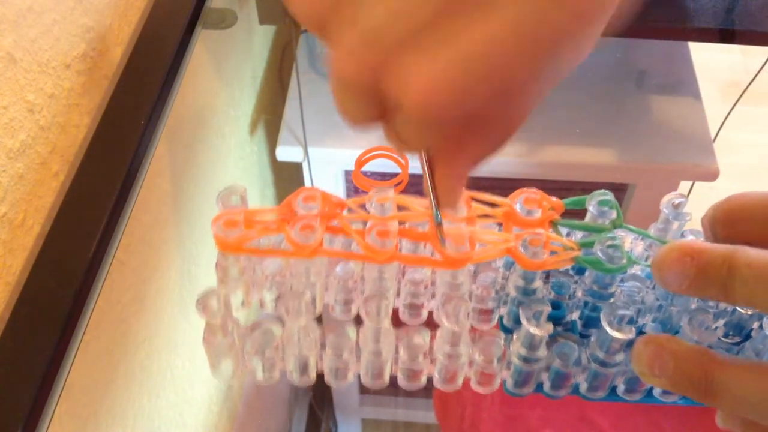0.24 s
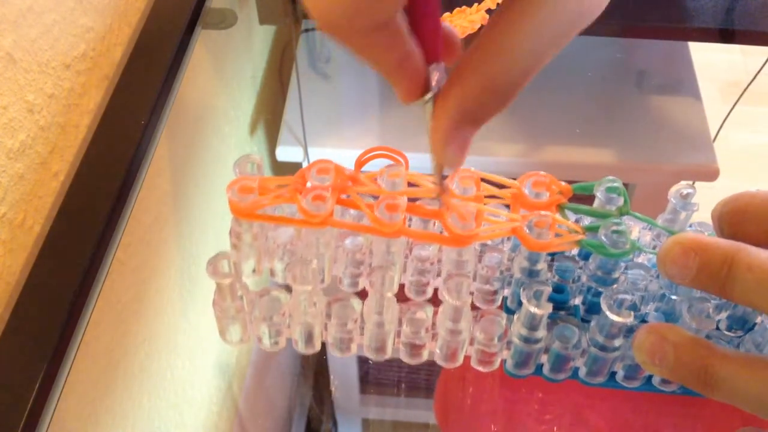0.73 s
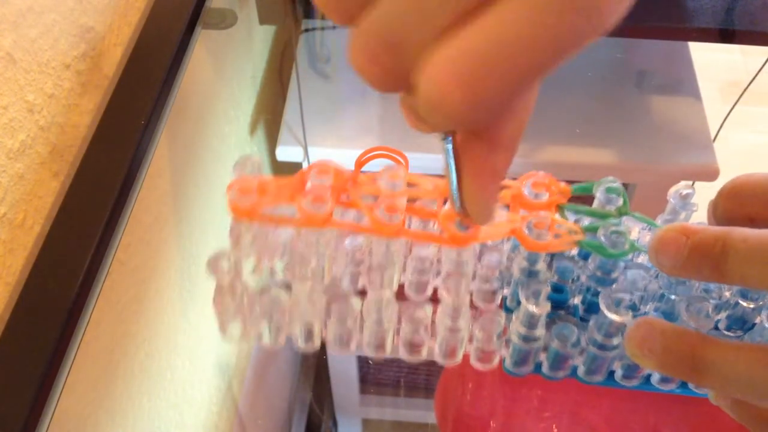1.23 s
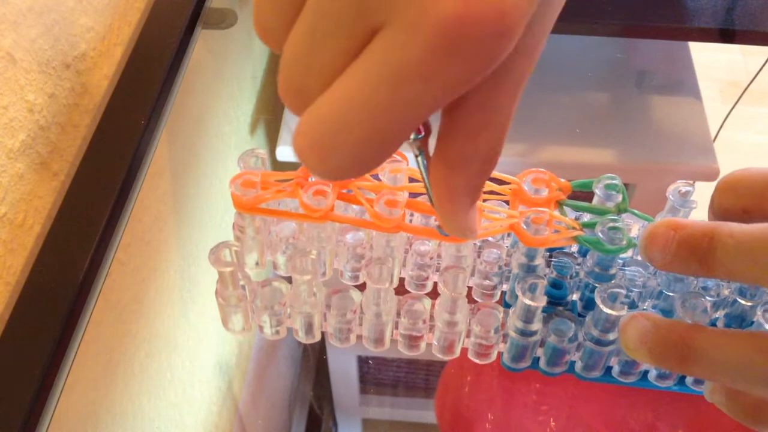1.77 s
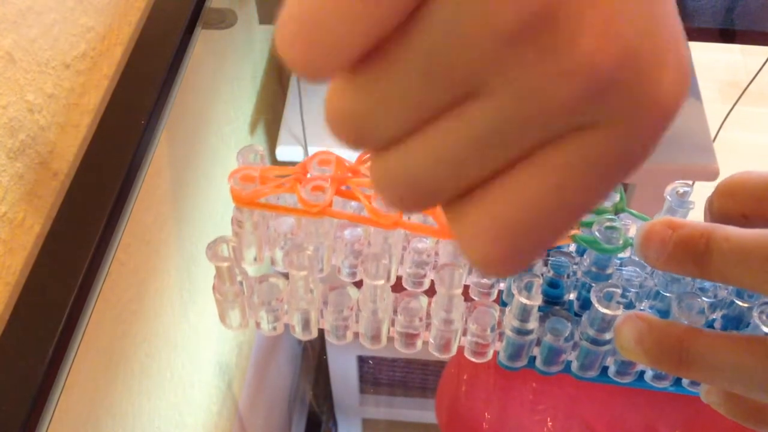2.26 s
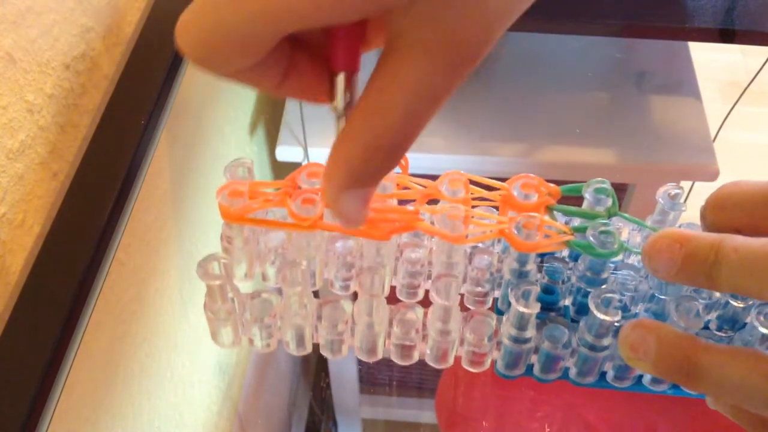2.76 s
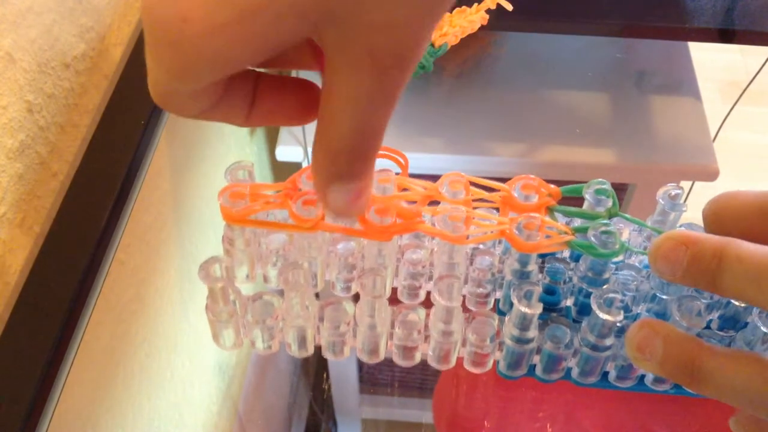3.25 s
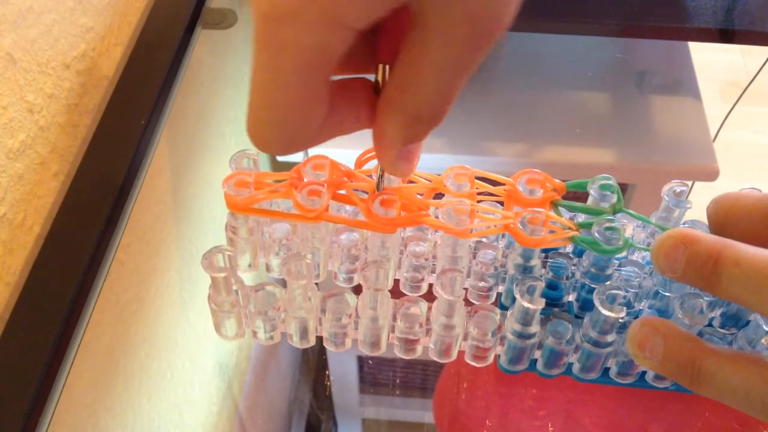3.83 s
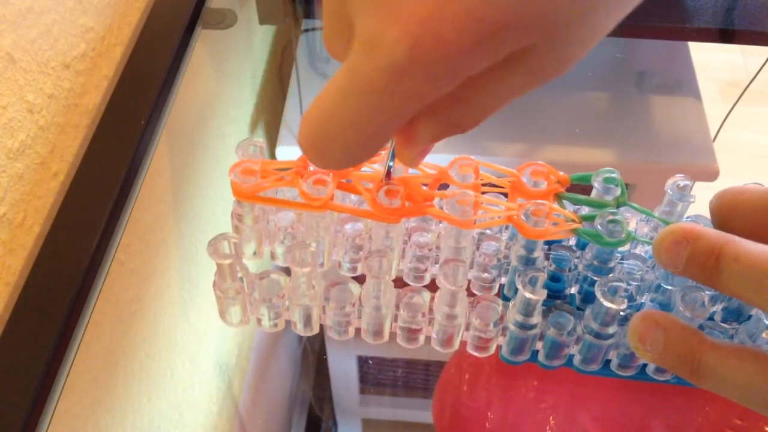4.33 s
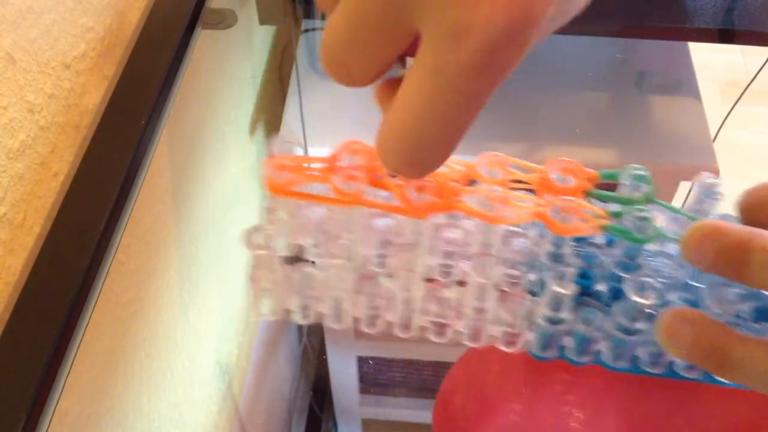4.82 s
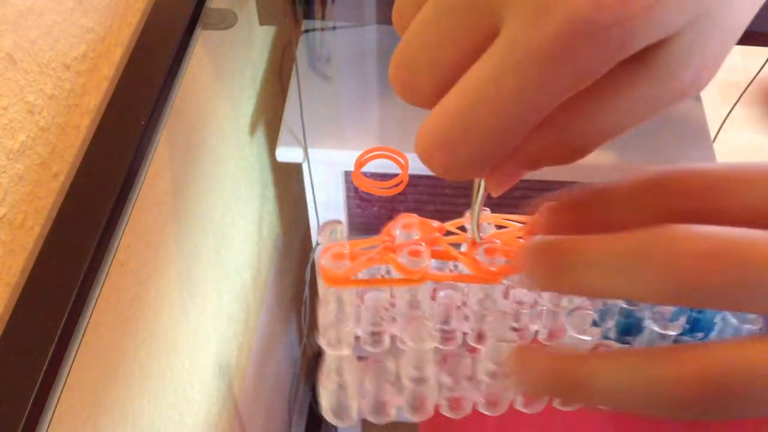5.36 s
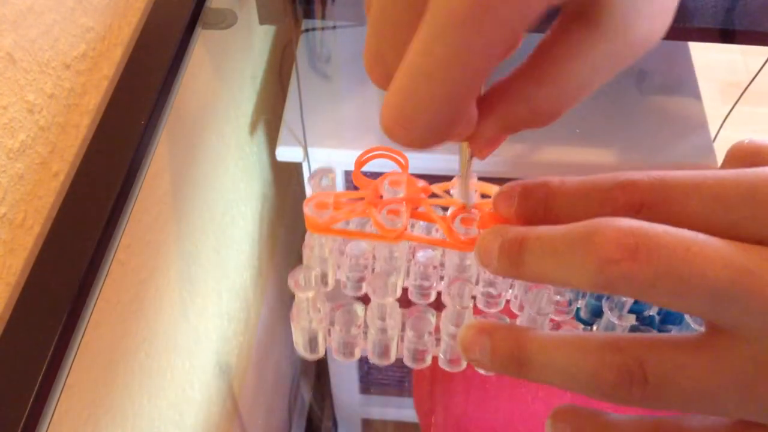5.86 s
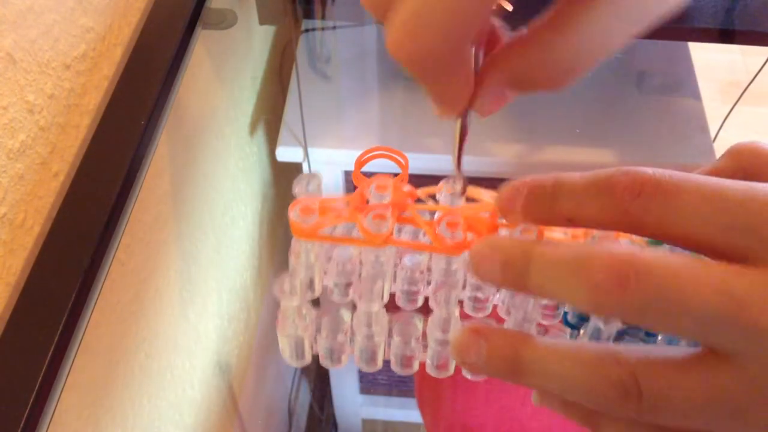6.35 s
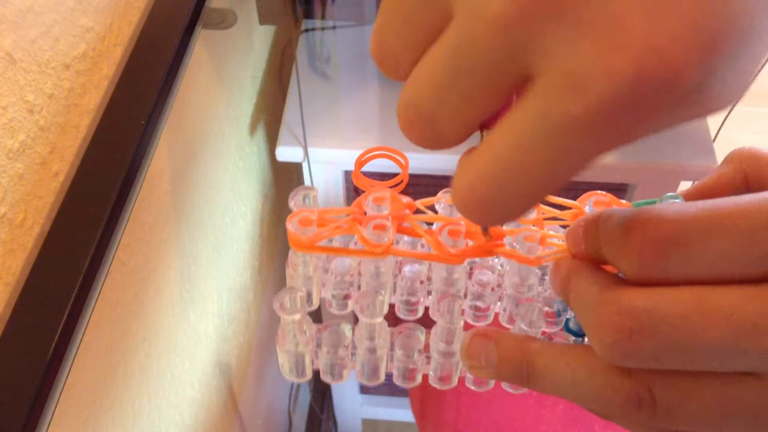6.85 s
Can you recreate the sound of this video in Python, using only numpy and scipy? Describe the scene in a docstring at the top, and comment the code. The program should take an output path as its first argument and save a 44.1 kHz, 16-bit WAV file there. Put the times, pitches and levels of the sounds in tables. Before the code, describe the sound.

A metal hook works rubber bands over the plastic pegs of a small loom on a wooden desk, heard close in a small furnished room. Light, irregular clicks start at once, each with a brief plastic rattle and a soft knock through the desk. The two sharpest clicks come at about 1.8 and 2 seconds. Lighter taps continue until two more strong ones at 3.7 and 4 seconds, and another at 4.4. From about 4.7 seconds the loom is lifted, rocked and slid, giving a dense run of duller knocks and clicks, with short scrapes and tiny, high rubber squeaks around 5 seconds. Clusters of taps and knocks follow from 5.5 to 6 seconds and again near 6.8. A last soft thump lands at about 7.1 seconds. Faint rubbing and shuffling of the handled loom and a low, steady microphone hiss run throughout.

```python
"""A metal hook works rubber bands over the plastic pegs of a small loom on a wooden desk, close-miked.
Light taps come first: each clicks in the pegs, rattles the frame and knocks the desk. The sharpest fall
near 1.8-2 s and 3.7-4 s. From 4.7 s the loom is lifted, rocked and slid, knocking densely while bands
skid and squeak; a last thump lands at 7.1 s. Throughout, hands shuffle the loom and a small furnished
room answers over microphone hiss."""
import sys
import numpy as np
from scipy import signal
from scipy.fft import rfft, irfft, next_fast_len
from scipy.io import wavfile
from scipy.ndimage import uniform_filter1d, map_coordinates

SR = 44100
rng = np.random.default_rng(int(sys.argv[2]) if len(sys.argv) > 2 else 0)


def waveform_to_disk(signal):
    """Save audio, clipped to [-1, 1], as 16-bit WAV at the path in sys.argv[1]."""
    frames = np.transpose(np.atleast_2d(signal))
    scaled = np.clip(frames, -1, 1) * 32767
    samples = np.round(scaled).astype(np.int16)
    wavfile.write(sys.argv[1], SR, samples)


N = 312669
CONTACT_N = 16384  # samples per contact, room tail included
LIFTED_S, MOVED_S = 4.7, 5.3  # loom lifted; loom slid to another spot

# modes: f/Hz, width/Hz, level/dB
PEG_MODES = [(3400, 220, 0), (3970, 210, 6), (4590, 340, 6), (5220, 670, 4.5), (6020, 370, 4.5),
             (6620, 410, 4.5)]
HOOK_MODES = [(7940, 1660, 3.9), (9600, 2130, 5), (11100, 1470, 0.72), (11500, 240, 6.4),
              (14300, 5600, 0.5)]
RATTLE_MODES = [(1450, 210, -3), (1775, 64, 3.5), (2056, 56, -7), (2400, 154, 2.5), (2390, 1420, -3.5)]  # frame, upper
CLACK_MODES = [(639, 140, -0.5), (810, 62, 3.5), (915, 27.6, 4.5), (1050, 127, 0.5), (1180, 36.5, 5)]  # frame, lower
DESK_MODES = [(301, 24, -4), (427, 20, -4), (544, 40, -5)]
THUMP_MODES = [(160, 65.5, -10.5), (203.6, 53.5, -6.5)]  # desk, lowest
DESK_MODE_BEFORE_LIFT, DESK_MODE_AFTER_LIFT = (334, 24, 0), (349, 15, 1)  # strongest desk mode


def taps():
    """Hook strikes peg: both chatter brightly; the push passes through the frame into the desk."""
    # strikes: t/s, click level/dB, hook tick re click/dB, push level/dB, peg f/Hz, peg bar f/Hz
    strikes = [(0.0357, -60.5, -4, -52, 3700, 1380), (0.19, -35, -2.5, -48.0, 3400, 1740),
               (0.259, -40.5, -20.0, -55, 3400, 2080), (0.433, -44.0, -15.5, -57.5, 4560, 1650),
               (0.451, -52, -8, -55, 6670, 1420), (0.6552, -47, -20, -58.5, 4600, 2085),
               (1.264, -36.5, -5.5, -58.5, 4940, 2870), (1.406, -50.5, -8, -76, 7260, 2700),
               (1.52, -36.5, -15, -59, 6470, 1660), (1.63, -34, 3.5, -52.5, 3970, 2090),
               (1.727, -67.5, 8, -59, 4590, 1660), (1.835, -13, -9.5, -43, 5850, 2310),
               (1.9852, -15, -3.5, -46.5, 6500, 2340), (2.2275, -30, -8.5, -43, 3780, 2400),
               (2.3223, -30.5, -10, -50.5, 5900, 1975), (2.4791, -46.5, -1, -55.5, 3970, 2450),
               (2.49, -43, -12, -54.5, 3920, 1600), (2.5077, -42, -21, -58.5, 4100, 1780),
               (2.672, -35, -13, -50, 3300, 2270), (2.692, -27, -9, -47, 4330, 2890),
               (2.9484, -42, -2, -50, 4000, 2560), (2.995, -48, -5, -52.5, 3430, 2060),
               (3.0967, -35.5, 4, -49.5, 4590, 2114), (3.185, -50, -22, -51, 3900, 1390),
               (3.209, -31, -2, -46, 4660, 1784), (3.3136, -50, -1.5, -59, 3970, 1930),
               (3.4016, -30, -7, -42.0, 3830, 2444), (3.512, -33.5, -0.5, -47.5, 3950, 1710),
               (3.702, -18.5, -4, -50, 6100, 1380), (3.8072, -46, -13, -57, 5100, 1650),
               (3.8935, -43.5, -16.0, -47, 3760, 1380), (4.0427, -19.5, -3, -34, 6040, 2030),
               (4.4066, -26, -5, -42.5, 3940, 1754), (4.855, -34, -7, -50, 7960, 1920),
               (4.979, -40, -7, -58, 7200, 1820), (4.9868, -41, 3, -57, 6000, 1710),
               (5.044, -33.5, -14, -55, 7500, 1750), (5.0506, -32, -17, -58, 4000, 2160),
               (5.078, -32, -25.0, -60, 3760, 1450), (5.0981, -30.5, -5, -45.5, 3910, 2470),
               (5.12, -36, -24.0, -61, 3800, 2050), (5.166, -44.5, -3, -80, 5830, 1510),
               (5.403, -35, -13, -58.5, 5960, 2580), (5.572, -43, -9, -49.5, 4040, 2520),
               (5.5988, -33, -3.5, -60, 7040, 2500), (5.6249, -41, -5, -48, 7400, 2550),
               (5.686, -44.5, -24.0, -65, 4000, 1590), (5.711, -45.5, -10, -76, 7800, 2220),
               (5.7289, -37.5, -7, -50, 5100, 2400), (5.752, -33.5, -7.5, -51.5, 5170, 2420),
               (5.7802, -42, -10, -49.5, 5260, 2130), (5.882, -39, 1.5, -44.5, 3830, 1530),
               (5.9365, -37, -9, -53, 3850, 1540), (5.9481, -42, -7, -43, 7540, 1660),
               (5.978, -31.5, -7.5, -39.5, 4070, 2600), (5.9832, -33, -15, -45, 4070, 1680),
               (6.0531, -31, -11.5, -42, 3850, 1550), (6.3603, -38.5, -33.0, -56, 5530, 2120),
               (6.453, -50.5, -9, -74, 3870, 1600), (6.469, -51, -15, -66, 3900, 1980),
               (6.527, -38.0, -14, -58.5, 6370, 2094), (6.564, -41, -11, -78, 3880, 2400),
               (6.595, -42, -14, -72, 6750, 1790), (6.737, -49.5, -1.5, -62, 3950, 2000),
               (6.771, -37.5, -6.5, -50.5, 8200, 2090), (6.7989, -30, -21, -49, 3940, 2400),
               (6.825, -31, -14, -46.5, 3890, 1930), (6.8325, -30, -8, -53, 4270, 2270),
               (7.0848, -37.5, -14, -43, 3970, 2060)]
    clear_hz = 4100  # higher pegs ring 10 dB/octave weaker
    out = np.zeros(N + CONTACT_N)
    for start_s, click_db, tick_db, push_db, peg_hz, bar_hz in strikes:
        click = blow(struck_at(PEG_MODES, peg_hz, fall_db_oct=5), rise_s=.0009, t60_s=.0065,
                     chatter=1.6, scatter_db=2.5, span_s=0, size=CONTACT_N // 16)
        tick = blow(HOOK_MODES, rise_s=.0009, t60_s=.0055, chatter=1.9, scatter_db=3,
                    size=CONTACT_N // 16)
        hit = amp(click_db - 2.5) * click + amp(click_db + tick_db) * tick
        ring_db = click_db - 2.5 - 10 * max(0, np.log2(peg_hz / clear_hz))
        rattle_db = push_db - 3 + .23 * (click_db - push_db)
        hit += ring(peg_hz, ring_db, t60_s=.019, send_db=-9)
        hit += ring(bar_hz, rattle_db + 3, t60_s=.034, send_db=.5)
        hit += frame_and_desk(start_s, rattle_db, clack_db=push_db - 3.5, knock_db=push_db - 9.5,
                              thump_db=push_db - 17.5, rattle_hz=bar_hz,
                              clack_hz=900 if start_s > MOVED_S else 1170, desk_hz=430)
        out[round(start_s * SR):][:CONTACT_N] += room(*hit, wet_db=-7, onset_s=.00039)
    return out[:N]


def knocks():
    """The loom rocks and lands: frame and desk ring, duller than under the hook."""
    # landings: t/s, clack level/dB, knock level/dB, thump level/dB, clack f/Hz
    landings = [(0.258, -54, -60, -58, 1180), (0.459, -52, -79, -88, 1100),
                (0.6581, -56.5, -59.5, -59, 1070), (0.886, -62, -69, -80, 1180),
                (0.914, -58.5, -68, -71, 1180), (1.179, -50.5, -56, -63, 915), (1.265, -51, -46, -51, 900),
                (1.5196, -59, -58, -67, 1170), (1.589, -56, -64, -61, 1180),
                (2.2258, -72, -47.5, -93, 1120), (2.6725, -47, -79, -72, 730),
                (3.2107, -74, -49, -54, 1060), (3.4026, -66, -57, -72, 1130),
                (4.0433, -47, -35.5, -51, 1000), (4.4071, -46, -40.5, -50, 1180),
                (4.621, -54.5, -75, -69, 1140), (4.7792, -57, -58.5, -73, 1150),
                (4.852, -38, -36.5, -48.5, 1200), (4.938, -37.5, -50, -46, 706),
                (5.0532, -56, -43.5, -48, 896), (5.0769, -33.5, -34, -64, 619),
                (5.0983, -40.5, -70, -49, 634), (5.1208, -45.5, -42.5, -49.5, 870),
                (5.083, -37, -47, -72, 915), (5.135, -51, -64, -62, 915), (5.4034, -52, -48.5, -56, 1140),
                (5.4667, -52, -50, -52, 1170), (5.5222, -39.5, -41, -41.5, 750),
                (5.5995, -45, -51, -45.5, 810), (5.707, -72, -54, -49.5, 720),
                (5.8582, -53.5, -74, -76, 1170), (5.9324, -44.5, -42, -46, 815),
                (5.979, -61, -50, -42, 900), (6.052, -42.5, -73, -44.5, 900),
                (6.371, -57.5, -55.5, -62, 870), (6.566, -51.5, -57, -55.5, 1180),
                (6.6865, -41, -48, -46, 716), (6.771, -72, -58, -63, 764), (6.8009, -74, -56, -47, 1150),
                (6.8248, -79, -56, -50.5, 900), (6.932, -52.5, -54, -53, 810),
                (7.073, -41.5, -45, -48, 590), (7.0854, -40, -45, -35.5, 961)]
    soft_hz = 2200
    out = np.zeros(N + CONTACT_N)
    for start_s, clack_db, knock_db, thump_db, clack_hz in landings:
        hit = frame_and_desk(start_s, clack_db - 3, clack_db, knock_db, thump_db, rattle_hz=1600,
                             clack_hz=clack_hz, desk_hz=430 if start_s > MOVED_S else 350)
        hit = filtered(hit, lambda hz: (1 + 1j * hz / soft_hz) ** -2)
        out[round(start_s * SR):][:CONTACT_N] += room(*hit, wet_db=-10, onset_s=.0025)
    return out[:N]


def frame_and_desk(start_s, rattle_db, clack_db, knock_db, thump_db, rattle_hz, clack_hz, desk_hz):
    """The heavier parts take mostly one clean push: the frame rattles and clacks, the desk knocks."""
    rattle = blow(struck_at(RATTLE_MODES, rattle_hz, fall_db_oct=7), rise_s=.0008, t60_s=.022,
                  chatter=.8, scatter_db=3, size=CONTACT_N // 6)
    clack = blow(struck_at(CLACK_MODES, clack_hz, fall_db_oct=13.5), rise_s=.0006, t60_s=.03,
                 chatter=.8, scatter_db=1.5, size=CONTACT_N // 5)
    main_mode = DESK_MODE_AFTER_LIFT if start_s > LIFTED_S else DESK_MODE_BEFORE_LIFT
    desk_modes = struck_at(sorted(DESK_MODES + [main_mode]), desk_hz, fall_db_oct=18)
    knock = blow(desk_modes, rise_s=.0009, t60_s=.015, chatter=.4, scatter_db=1.5)
    thump = blow(THUMP_MODES, rise_s=.00095, t60_s=.023, chatter=.99, scatter_db=8, size=CONTACT_N // 6)
    return amp(rattle_db) * rattle + amp(clack_db) * clack + amp(knock_db) * knock + amp(thump_db) * thump


def blow(modes, rise_s, t60_s, chatter, scatter_db, span_s=.0031, size=CONTACT_N // 3):
    """A push and decaying chatter ring the modes. Rows: direct (rms 1 in loudest span_s), room send."""
    t = np.arange(size) / SR
    attack = 1 - np.exp(-(t / rise_s) ** 2)
    decay = amp(-60 * t / t60_s) + .4 * amp(-60 * t / (3.5 * t60_s))
    noise = attack * decay * rng.standard_normal(size)
    push = 1. * (np.arange(size) == int(rise_s * SR))
    direct = filtered(push + chatter * noise / np.linalg.norm(noise), resonant(modes, scatter_db))
    direct /= np.sqrt(uniform_filter1d(direct ** 2, 1 + int(span_s * SR)).max())
    send = filtered(push, resonant(modes))  # mean over all directions
    send *= np.linalg.norm(direct) / np.linalg.norm(send)
    return np.pad([direct, send], [(0, 0), (0, CONTACT_N // 3 - size)])


def ring(hz, level_db, t60_s, send_db):
    """One clear mode of a peg or its bar rings briefly. Rows: direct, room send."""
    t = np.arange(CONTACT_N // 3) / SR
    attack = 1 - np.exp(-t / .0012)
    tone = attack * amp(level_db - 60 * t / t60_s) * np.sin(2 * np.pi * hz * t)
    return tone * amp([[0], [send_db]])


def skids():
    """Hook or band sticks and slips along the pegs: tiny jerks ring pegs, hook and frame."""
    # slides: t/s, length/s, peg level/dB, frame level/dB
    slides = [(0.195, 0.042, -82, -65.5), (0.307, 0.034, -75, -68.5), (0.515, 0.066, -84, -72.5),
              (1.451, 0.074, -86, -70.5), (3.324, 0.027, -66, -56.5), (4.403, 0.0051, -57, -46.5),
              (4.872, 0.0067, -59, -59), (4.989, 0.16, -58.5, -63.5), (5.469, 0.063, -78, -64.5),
              (5.619, 0.11, -68, -72), (5.894, 0.2, -87, -63), (6.348, 0.0096, -55.5, -63),
              (6.386, 0.13, -71, -75), (6.57, 0.029, -64.5, -74)]
    peg_modes = struck_at(PEG_MODES + HOOK_MODES, 3800, fall_db_oct=4)
    frame_modes = struck_at(CLACK_MODES[2:] + RATTLE_MODES, 990, fall_db_oct=3)
    out = np.zeros(N + CONTACT_N)
    for start_s, length_s, peg_db, frame_db in slides:
        count = int(length_s * SR)
        friction = rng.standard_normal(count) * amp(32 * uniform_filter1d(rng.standard_normal(count), 64))
        jerks = unit(friction) + unit(slips(count, rate_hz=700, spread_db=6))
        jerks = np.pad(jerks * signal.windows.tukey(count, .3), (0, CONTACT_N // 8))
        peg = filtered(jerks, resonant(peg_modes))
        frame = filtered(jerks, resonant(frame_modes))
        scrape = amp(peg_db) * peg / peg[:count].std() + amp(frame_db) * frame / frame[:count].std()
        out[round(start_s * SR):][:CONTACT_N] += room(scrape, scrape, wet_db=-2, onset_s=.0041)
    return out[:N]


def slips(count, rate_hz, spread_db):
    """Sparse slips at random moments, a few much larger than the rest."""
    chance, rarity = rng.random((2, count))
    strength = amp(-spread_db * np.log(rarity + .00036))
    return (chance < rate_hz / SR) * strength * rng.standard_normal(count)


def squeaks():
    """Rubber stutters on plastic: noise in one high resonance, fading as the band settles."""
    # band drags: t/s, length/s, level before the fade/dB, f/Hz
    drags = [(4.983, 0.035, -41, 12700), (5.041, 0.014, -43, 10700), (5.049, 0.013, -46, 12400),
             (5.11, 0.028, -53, 12600), (5.461, 0.11, -64, 12400), (6.594, 0.008, -53, 12700)]
    width_hz, fade_db = 800, 15
    out = np.zeros(N + CONTACT_N)
    for start_s, length_s, level_db, pitch_hz in drags:
        count = int(length_s * SR)
        mode = resonant([(pitch_hz, width_hz, 0)])
        whistle = unit(filtered(rng.standard_normal(CONTACT_N), lambda hz: mode(hz) ** 2))[:count]
        envelope = amp(level_db - fade_db * np.arange(count) / count) * signal.windows.tukey(count, .3)
        out[round(start_s * SR):][:count] += envelope * whistle
    return out[:N]


def leans():
    """A palm leans on the desk: a few slow swings of the whole top."""
    # pushes: t/s, level/dB
    pushes = [(0.997, -54), (2.999, -44.5), (4.836, -54)]
    swing_hz, rise_s, t60_s = 108, .008, .079
    t = np.arange(CONTACT_N // 2) / SR
    swing = (1 - np.exp(-t / rise_s)) * amp(-60 * t / t60_s) * np.sin(2 * np.pi * swing_hz * t)
    out = np.zeros(N + CONTACT_N)
    for start_s, level_db in pushes:
        out[round(start_s * SR):][:len(t)] += amp(level_db) * swing
    return out[:N]


def shuffle():
    """The loom shifts on the desk in lumps; bands and fingers rub the pegs in fine grains."""
    # handling: t/s, creak level/dB, rub level/dB
    handling = [(0.0, -72.5, -73), (0.33, -78.5, -76), (0.97, -74.5, -75.5), (1.52, -71.5, -86),
                (1.99, -75, -65), (2.98, -75.5, -86), (3.28, -70, -76), (4.21, -80.5, -79),
                (4.86, -70.5, -69.5), (5.01, -66, -63), (5.23, -72, -66), (5.9, -68.5, -68),
                (6.12, -80.5, -73), (6.36, -71.5, -76), (6.69, -67.5, -76), (7.09, -74.5, -72)]
    times_s, creak_db, rub_db = np.transpose(handling)
    rumble_db = -73.5 + 2.54 * (creak_db - creak_db.mean())  # swings wider than the creak
    gain = lambda db: amp(np.interp(np.arange(N) / SR, times_s, db))
    lumps = amp(3 * wobble(rate_hz=30)) * rng.standard_normal((2, N))
    desk_modes = struck_at(sorted(DESK_MODES + [DESK_MODE_AFTER_LIFT]), 420, fall_db_oct=23.5)
    rumble = unit(filtered(lumps[0], resonant(THUMP_MODES + desk_modes)))
    creak = unit(filtered(lumps[1], resonant(CLACK_MODES + RATTLE_MODES)))
    grains = amp(2.6 * wobble(rate_hz=73)) * rng.standard_normal(N)
    rub = unit(filtered(grains, resonant(PEG_MODES + HOOK_MODES)))
    return gain(rumble_db) * rumble + gain(creak_db) * creak + gain(rub_db) * rub


def room(direct, send, wet_db, onset_s):
    """Direct sound plus a diffuse tail that dies sooner in the treble."""
    # room decay: f/Hz, t60/s
    decay = [(150, 0.41), (500, 0.31), (2000, 0.29), (6000, 0.23), (14000, 0.13)]
    hz, t, spectra = signal.stft(rng.standard_normal(CONTACT_N), SR, nperseg=256)
    tail = signal.istft(spectra * amp(-60 * t / along(decay, hz)[:, None]), SR, nperseg=256)[1]
    tail *= 1 - np.exp(-(np.arange(len(tail)) / SR / onset_s) ** 2)  # reflections build up
    out = signal.fftconvolve(send, amp(wet_db) * tail / np.linalg.norm(tail))[:CONTACT_N]
    out[:len(direct)] += direct
    return out


def hiss():
    """Steady room tone and microphone noise."""
    # noise density: f/Hz, relative level/dB
    density = [(25, -5), (59, -2), (144, 5.5), (297, 9.5), (523, 1), (895, -8), (1660, -7), (12500, -5),
               (15500, -11)]
    return amp(-70.5) * unit(filtered(rng.standard_normal(N), lambda hz: amp(along(density, hz))))


def struck_at(modes, centre_hz, fall_db_oct):
    """The place of the blow favours the modes near centre_hz."""
    return [(hz, width_hz, db - fall_db_oct * abs(np.log2(hz / centre_hz))) for hz, width_hz, db in modes]


def resonant(modes, scatter_db=0):
    """Causal response of modes of alternating sign, their levels scattered at random."""
    mode_hz, width_hz, db = np.transpose(modes)[..., None]
    sign = (-1.) ** np.arange(len(modes))[:, None]
    gain = sign * amp(db + scatter_db * rng.standard_normal(db.shape))
    return lambda hz: np.sum(gain * 1j * hz * width_hz / (mode_hz**2 - hz**2 + 1j * hz * width_hz), 0)


def filtered(x, response):
    """x through a complex frequency response."""
    size = next_fast_len(x.shape[-1] + 1024)
    return irfft(rfft(x, size) * response(np.fft.rfftfreq(size, 1 / SR)), size)[..., :x.shape[-1]]


def wobble(rate_hz):
    """Smooth random curve with knots at rate_hz."""
    knots = rng.standard_normal(int(N * rate_hz / SR) + 4)
    return map_coordinates(knots, [np.arange(N) * rate_hz / SR])


def along(points, hz):
    """Interpolate (f/Hz, value) points on a log axis."""
    knots_hz, values = np.transpose(points)
    return np.interp(np.log(hz + 1), np.log(knots_hz + 1), values)


def amp(db):
    """dB to gain."""
    return 10 ** (np.asarray(db) / 20)


def unit(x):
    """x at rms 1."""
    return x / np.sqrt(np.mean(x ** 2) + 1e-20)


def scene():
    """All sources at one microphone."""
    return (taps() + knocks() + skids() + leans() + shuffle() + squeaks() + hiss())[None]


def record(dry):
    """The microphone loses the deep bass; the recorder cuts off at its band limit."""
    bass_hz, top_hz = 70, 15300
    highpass = lambda hz: (1j * hz / (1j * hz + bass_hz)) ** 2
    lowpass = lambda hz: 1 / np.sqrt(1 + np.minimum(hz / top_hz, 1.5) ** 400)
    return filtered(dry, lambda hz: highpass(hz) * lowpass(hz))


dry = scene()
out = record(dry)
waveform_to_disk(out)
```